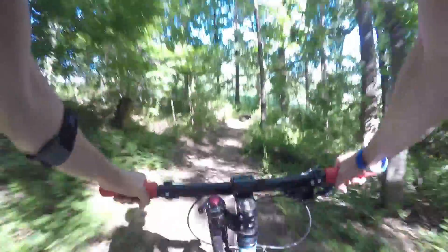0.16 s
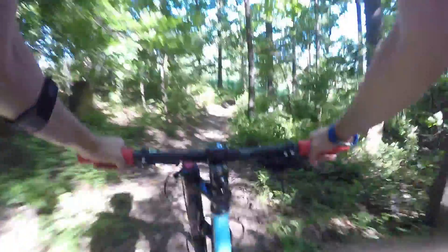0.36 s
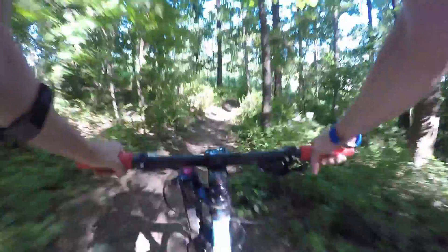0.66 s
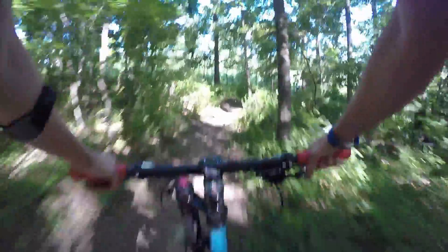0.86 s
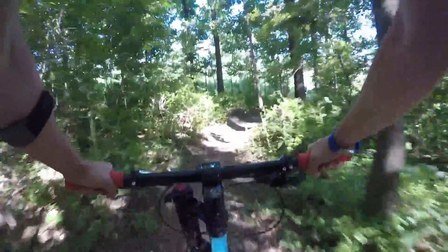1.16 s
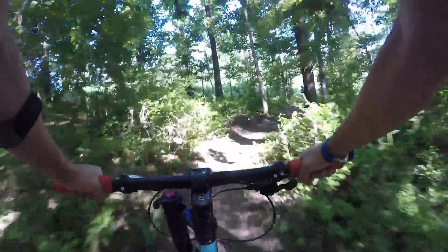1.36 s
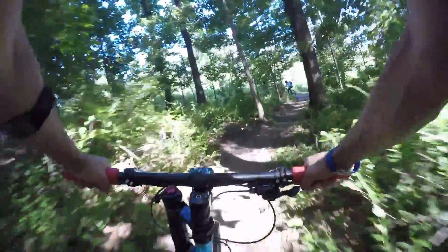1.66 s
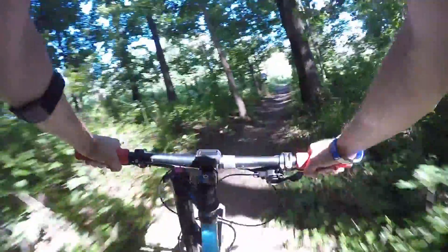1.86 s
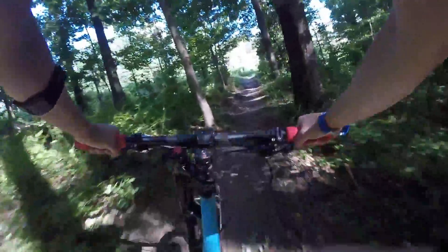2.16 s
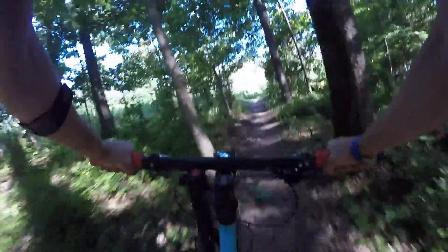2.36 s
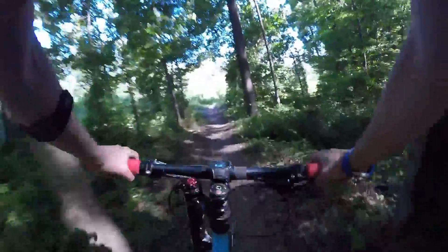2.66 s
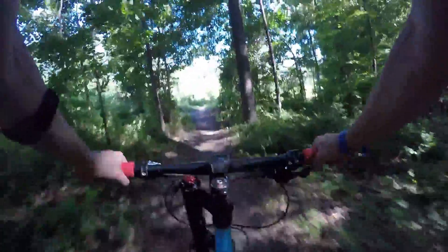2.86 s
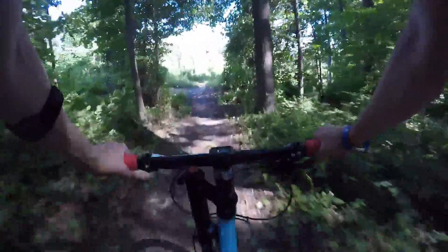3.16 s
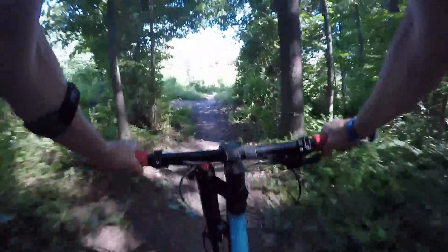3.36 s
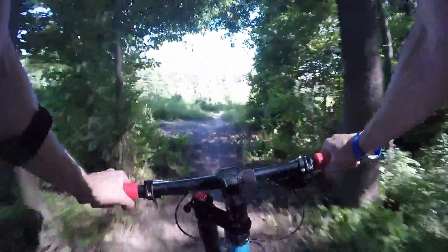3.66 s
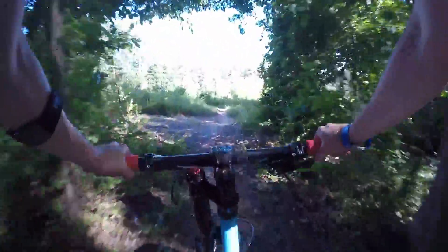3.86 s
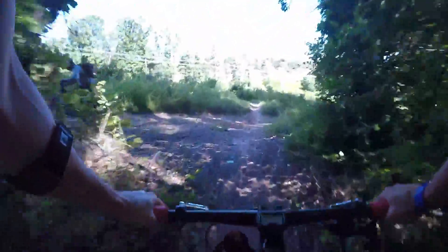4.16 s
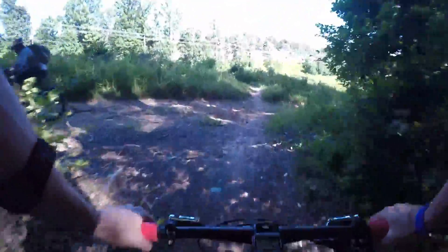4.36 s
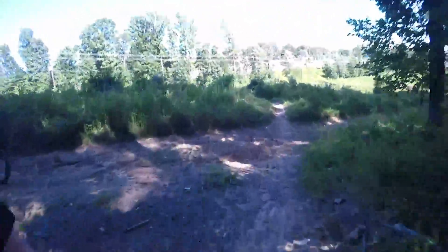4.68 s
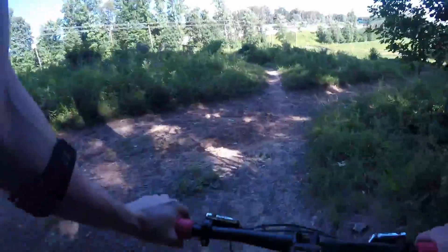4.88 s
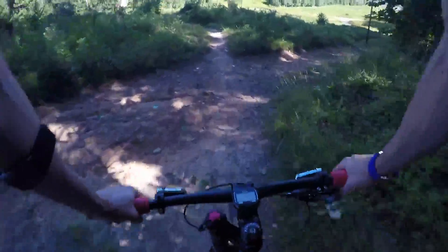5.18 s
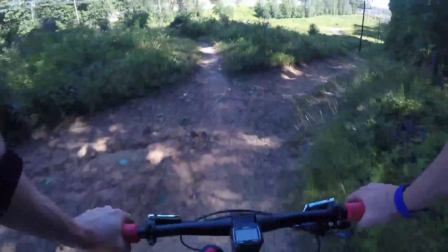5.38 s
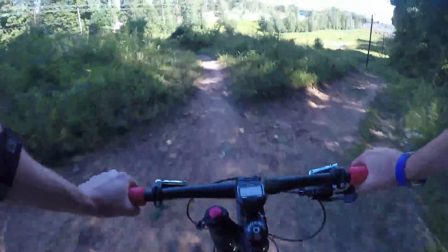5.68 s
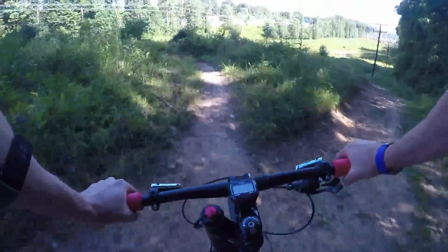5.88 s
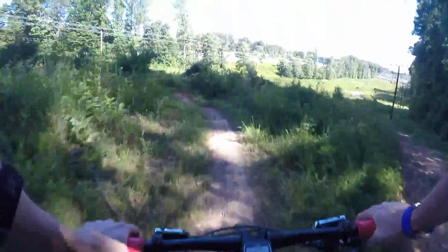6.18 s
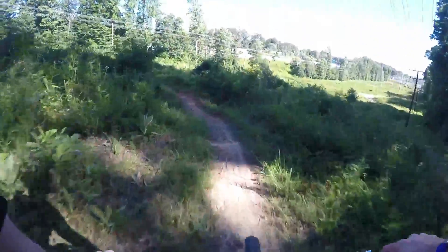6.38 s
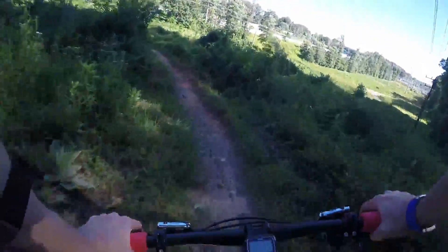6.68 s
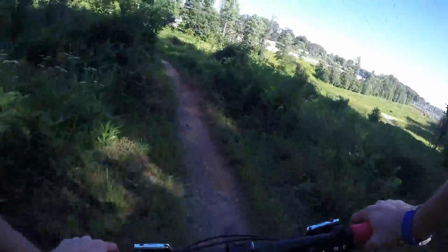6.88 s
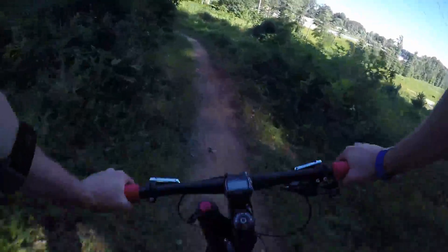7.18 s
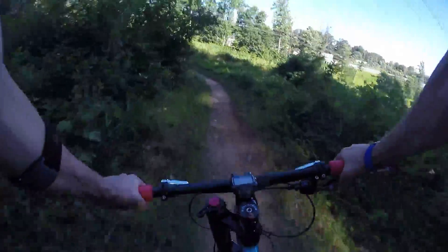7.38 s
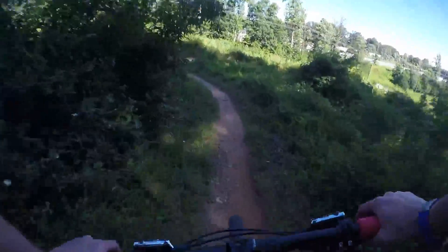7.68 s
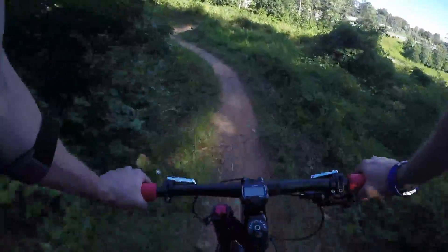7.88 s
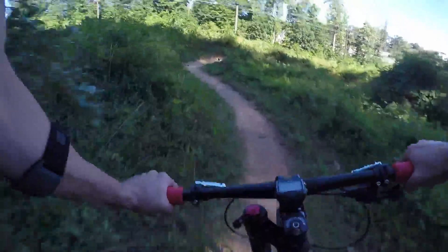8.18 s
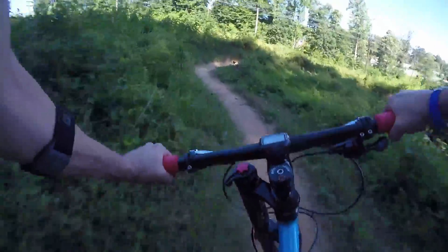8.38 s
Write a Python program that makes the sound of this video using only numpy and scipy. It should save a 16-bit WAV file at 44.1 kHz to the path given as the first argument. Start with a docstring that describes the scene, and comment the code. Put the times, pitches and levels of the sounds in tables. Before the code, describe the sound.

A mountain bike coasts along a dirt trail, heard from a muffled, boxy microphone housing on the rider's chest. Tyre crunch, low body rumble and a tiny sharp knock open at 0 s. From 0.3 s deep, soft heartbeats thump about 165 a minute to the end, varying in strength. A dry, rapid freehub ratchet starts near 0.5 s, slows and stops around 2.2 s, then resumes at 2.4 s and buzzes on with wavering speed. Light stone and cable clicks scatter, densest from 2.2 to 3.2 s, as rumble swells near 3.1 s. Knocks are sparser until 5.5 s, when loose gravel crunches. A heavy knock and rumble surge hit at 6.5 s, a bright hard crack at 6.85 s, a short leaf swish at 7.1 s. Coarser gravel follows at 7.25 and 8.0 s, with strong rattling knocks from 8.2 s and rising rumble. Faint wind hiss lies underneath.

```python
"""Body rumble and tyre crunch open the scene, with a sharp knock at once; heartbeats thump from 0.3 s.
A mountain bike coasts down a dirt trail, heard by a microphone in a closed housing strapped to the rider's chest.
Heart: enveloped low sines. Rumble, wind hiss: coloured noise. Tyres: noise roar and random grains. Freehub:
paired noise bursts per tooth while the pedals rest. Stones and cables: band-passed decaying knocks. A leaf: one
noise puff. Cavity resonances colour all but heart, rumble and hiss."""
import sys
import numpy as np
from scipy import signal
from scipy.fft import rfft, irfft, next_fast_len
from scipy.io import wavfile

SR = 44100
rng = np.random.default_rng(int(sys.argv[2]) if len(sys.argv) > 2 else 0)


def persist_wave(psi):
    """Save psi, clipped to +-1, as 16-bit WAV."""
    counts = np.round(np.clip(psi, -1, 1) * 32767).astype(np.int16)
    wavfile.write(sys.argv[1], SR, np.atleast_2d(counts).T)


N = 376613

# heartbeats: [t/s, first closure level/dB]
BEATS = [(0.31, -13), (0.68, -12), (1.045, -5.5), (1.41, -6), (1.775, -5.5), (2.141, -10), (2.507, -6),
         (2.867, -8), (3.235, -8.5), (3.595, -6), (3.96, -7.5), (4.323, -9), (4.68, -14), (5.052, -9.5),
         (5.413, -10.5), (5.779, -10), (6.135, -14.5), (6.51, -17), (6.872, -11), (7.221, -4), (7.587, -19),
         (7.961, -10), (8.31, -17)]
# valve closures: [delay/s, f/Hz, half length/s]
VALVES = [(0.012, 44, 0.01), (.032, 62, 0.0097)]
# faint edge of a beat: [delay/s, f/Hz, half length/s, level re first closure/dB]
BEAT_EDGE = (0.16, 108, 0.07, -20.5)
SECOND_VALVE_DB, SECOND_SPREAD_DB = -16, 4   # independent of the first closure

# knocks of stones and cables: [t/s, peak level/dB, pitch/octaves above 1 kHz]
KNOCKS = [(.0358, -26, 1.3), (.2329, -27.5, 3), (.512, -31.5, -1.5), (1.1885, -32, -1.1), (1.408, -20, 2.2),
          (1.498, -27.5, 1.8), (1.698, -23.5, 1.9), (1.9392, -26.5, 2), (2.186, -32, 0.2), (2.23, -29, 0),
          (2.3003, -22, 1), (2.382, -29, 0), (2.5065, -23.5, 1.9), (2.676, -25, 3), (2.771, -23, -1),
          (2.83, -20, 1.9), (2.951, -23.5, -1.1), (2.9857, -26.5, .1), (3.0921, -28.5, -.4),
          (3.187, -23, 1.3), (4.027, -24.5, -1.6), (4.829, -25.5, -.2), (4.9277, -31, -1),
          (4.9555, -25, -1), (4.975, -30.5, -0.9), (5.4744, -19, 2.2), (5.561, -26, 5), (6.0993, -30.5, 0),
          (6.5229, -8, 0.35), (6.5978, -26, -0.7), (6.843, -3.5, 4.5), (7.2245, -24, -.8),
          (7.296, -20.5, -1.3), (7.425, -23.5, -1.4), (8.1754, -10.5, 0.5), (8.315, -14.5, -0.1),
          (8.427, -9.5, -0.2)]
# bands of a knock, top to bottom: [low f/Hz, high f/Hz, t60/s]
KNOCK_BANDS = [(1740, 3850, 0.025), (870, 1605, 0.017), (295, 800, 0.013)]
# band loss away from the pitch, less for heavy knocks: [peak level/dB, loss/(dB per octave squared)]
KNOCK_FALL = [(-17, 7.5), (-8, 3)]
THUD_FLOOR_DB = -17   # lowest band, re knock peak

# freehub, one list per coast: [t/s, tick rate/(1/s)]
COASTS = [
    [(.489, 55), (.62, 67), (.87, 42), (1.1, 76), (1.35, 52), (1.65, 69.4), (1.88, 55), (1.98, 27),
     (2.17, 13)],
    [(2.44, 58), (2.59, 68), (2.76, 48), (3.06, 64), (3.34, 54), (3.9, 53), (4.17, 76), (4.44, 48),
     (4.84, 45.4), (5.25, 51.5), (5.76, 68.5), (6.06, 66), (6.34, 54.5), (6.66, 64), (7.2, 62), (7.39, 86),
     (7.62, 55), (7.88, 70), (8.26, 43), (8.54, 54.6)],
]
FREEHUB_DB = -33

# tyres on the trail: [t/s, dull roll level/dB, crunch level/dB]
TREAD = [(0, -32, -34), (.3, -40, -42.5), (1, -37, -40), (1.3, -46.5, -42), (2.1, -37, -42),
         (2.7, -39, -38), (4.7, -38.5, -43), (5.3, -38.5, -39), (6.4, -36.5, -39.5), (8.54, -35, -38)]
# loose gravel under the tyres: [start t/s, hold/s, crunch level/dB]
GRAVEL = [(0.933, .08, -40), (5.552, 0.34, -34), (7.256, 0.16, -29), (8.03, .3, -32)]
GRAVEL_ATTACK_S, GRAVEL_FADE_PER_HOLD = 0.018, 0.68

# a leaf whips past: [t/s, level/dB, half length/s]
LEAF = (7.092, -16, .008)

# body rumble over time: [t/s, level/dB]
BODY = [(0, -22), (.26, -21), (.55, -29), (1.2, -24.5), (2.5, -25), (3.1, -17), (3.6, -28.5), (4.2, -27.5),
        (4.8, -25.5), (5.7, -26.5), (6.4, -23), (6.58, -14.5), (6.8, -27.5), (7.4, -18.5), (7.9, -21.5),
        (8.54, -16)]
# body rumble spectrum: [f/Hz, relative level/(dB per Hz)]
RUMBLE = [(7.1, -28), (12, 8), (27, 10.5), (44, -6), (95, -13.5), (192, -34), (285, -37.5), (400, -50),
          (520, -79), (880, -120)]

# wind hiss spectrum: [f/Hz, relative level/(dB per Hz)]
HISS = [(150, 25), (400, -5.5), (1400, 1), (4000, -3), (8000, -6.5), (15000, -11.5)]
HISS_DB = -58

# housing cavity resonances: [f/Hz, width/Hz, level/dB]
HOUSING = [(320, 330, -9.5), (456, 415, -3.5), (782, 430, -5), (1053, 350, 0.5), (1770, 265, 1.5),
           (2310, 594, -2), (2893, 623, 2), (3550, 940, -5), (4186, 230, -7.5), (4717, 355, -6),
           (5580, 680, -8), (6440, 510, -7), (7590, 1100, -17.5), (9770, 1820, -13.5), (11340, 1900, -24),
           (13700, 3900, -22.5)]
CUTOFF_HZ = 15300


def heart():
    """Two valve closures a beat shake the chest wall: sines under Gaussian envelopes."""
    out = np.zeros(N)
    t_s = np.arange(int(.1 * SR)) / SR - .03

    def swing(delay_s, hz, half_s):
        """Sine that swells and fades around its delay."""
        since_s = t_s - delay_s
        return np.sin(2 * np.pi * hz * since_s) * np.exp(-(since_s / half_s) ** 2)

    first, second = [swing(*valve) for valve in VALVES]
    # the edge peaks past the end of t_s: only its rising flank sounds
    first = first + from_db(BEAT_EDGE[3]) * swing(*BEAT_EDGE[:3])
    seconds_db = SECOND_VALVE_DB + SECOND_SPREAD_DB * rng.standard_normal(len(BEATS))
    for (beat_s, first_db), second_db in zip(BEATS, seconds_db):
        start = int((beat_s + t_s[0]) * SR)
        out[start:start + len(t_s)] += from_db(first_db) * first + from_db(second_db) * second
    return out


def knocks():
    """Sharp contact, then a short rattle in three bands; the top band lies lower in heavy knocks."""
    out = np.zeros(N + SR)
    t_s = np.arange(int(.05 * SR)) / SR
    knock_s, peak_db, pitch_oct = np.transpose(KNOCKS)
    starts = (knock_s * SR).astype(int)

    centres_oct = np.log2([np.sqrt(low * high) / 1000 for low, high, _ in KNOCK_BANDS])
    fall = np.interp(peak_db, *np.transpose(KNOCK_FALL))
    loss_db = fall * (centres_oct[:, None] - pitch_oct) ** 2
    bands_db = peak_db - loss_db + loss_db.min(axis=0)   # strongest band gets the knock's level
    bands_db[-1] = np.maximum(bands_db[-1], peak_db + THUD_FLOOR_DB)

    for band, (low_hz, high_hz, t60_s) in enumerate(KNOCK_BANDS):
        rattles = rng.standard_normal((len(KNOCKS), len(t_s))) * from_db(-60 * t_s / t60_s)
        rattles[:, 0] += 6   # contact
        for start, band_db, rattle in zip(starts, bands_db[band], rattles):
            shift = from_db(-.16 * (band_db + 19.0)) if band == 0 else 1   # frequency factor
            edges_hz = [low_hz * min(shift, 1.2), max(high_hz * shift, 1.3 * low_hz)]
            crack = cut(rattle, edges_hz, "band")
            out[start:start + len(t_s)] += from_db(band_db) * crack / np.abs(crack).max()
    return out[:N]


def freehub():
    """Ratchet as a function of resonance: a pawl drops at every passing tooth, a short bright rattle."""
    t_s = np.arange(N) / SR
    drops_s = []
    for coast in COASTS:
        points_s, per_s = np.transpose(coast)
        span_s = t_s[(t_s >= points_s[0]) & (t_s < points_s[-1])]
        teeth = np.cumsum(np.interp(span_s, points_s, per_s)) / SR
        tooth_numbers = np.arange(int(teeth[-1]) + 1) + .15
        drops_s += list(np.interp(tooth_numbers, teeth, span_s) - .004)
    chance = rng.standard_normal((len(drops_s), 2))
    drops_s = np.array(drops_s) + 0.00071 * chance[:, 0]
    shared_db = FREEHUB_DB + 0.94 * chance[:, 1]

    def at(hz):
        own_db = 3.03 * rng.standard_normal(len(drops_s))   # every drop favours other resonances
        gains = from_db(shared_db + own_db)
        # a second pawl follows 4 ms later
        both_s, both_gains = np.r_[drops_s, drops_s + .004], np.r_[gains, .7 * gains]
        ticks = bursts(both_s, both_gains, t60_s=0.048, rise_s=0.0012)
        return ticks / (1 + (3000 / hz) ** 2)
    return at


def tyres():
    """Tread as a function of resonance: roar plus clumped grit, dull below 1.4 kHz, crunchy above."""
    roll = from_db(in_time(TREAD))
    crunch = np.hypot(from_db(in_time(TREAD, 2)), gravel())
    clumps = from_db(5.0 * drift(9.8))
    lumps = from_db(2.0 * drift(7.3))

    def at(hz):
        roar = rng.standard_normal(N) * lumps * from_db(3.15 * drift(16.3))
        both = roar + from_db(-3.0) * grit(90 * clumps, spread_db=4.0)
        gain = roll if hz < 1400 else crunch
        return both * gain / (1 + (hz / 3900) ** 16.4)
    return at


def gravel():
    """Crunch gain on loose patches: each swells, holds and fades linearly."""
    t_s = np.arange(N) / SR
    gain = np.zeros(N)
    for start_s, hold_s, db in GRAVEL:
        corners_s = np.cumsum([0, GRAVEL_ATTACK_S, hold_s, GRAVEL_FADE_PER_HOLD * hold_s])
        gain += from_db(db) * np.interp(t_s - start_s, corners_s, [0, 1, 1, 0])
    return gain


def grit(per_s, spread_db):
    """Random grains of either sign, a few much larger than the rest; rms 1."""
    sizes = from_db(spread_db * np.minimum(rng.exponential(1, N), 4)) * rng.choice([-1, 1], N)
    hits = rng.random(N) < per_s / SR
    return rms_one(sizes * hits / np.sqrt(per_s))


def leaf():
    """A passing leaf: one smooth puff of high-passed noise."""
    peak_s, db, half_s = LEAF
    shape = np.exp(-((np.arange(N) / SR - peak_s) / half_s) ** 2)
    return from_db(db) * shape * cut(rng.standard_normal(N), 4100, "high")


def body_rumble():
    """Body shake through the strap: low noise of wandering level."""
    level_db = in_time(BODY) + 2.0 * drift(6.9) + 2.0 * drift(4.3)
    return from_db(level_db) * coloured(RUMBLE)


def wind_hiss():
    """Wind at the microphone: coloured noise of slowly wandering level."""
    return from_db(HISS_DB + 3.94 * drift(1.9)) * coloured(HISS)


def housing(common, scattered):
    """Parallel cavity resonances, steep-sided, signs alternating; scattered(hz) feeds one alone."""
    out = 0
    for k, (hz, width_hz, db) in enumerate(HOUSING):
        r = np.exp(-np.pi * width_hz / SR)
        b = (1 - r * r) / 2
        section = [b, 0, -b, 1, -2 * r * np.cos(2 * np.pi * hz / SR), r * r]
        ringing = signal.sosfilt([section, section], common + scattered(hz))
        out = out + (-1) ** k * from_db(db) * ringing
    return out


def from_db(db):
    """Gain of a level."""
    return 10 ** (np.asarray(db) / 20)


def rms_one(x):
    """Scale to unit rms."""
    return x / np.sqrt(np.mean(x ** 2) + 1e-20)


def in_time(rows, column=1):
    """One column of a curve at every sample."""
    points = np.array(rows)
    return np.interp(np.arange(N) / SR, points[:, 0], points[:, column])


def drift(corner_hz):
    """Slow chance: noise through a double one-pole low-pass, spread 1; made at SR / 40."""
    r = np.exp(-80 * np.pi * corner_hz / SR)
    noise = rng.standard_normal(N // 40 + 2002)
    slow = signal.lfilter([1], [1, -2 * r, r * r], noise)[2000:]   # settled part
    return np.interp(np.arange(N) / 40, np.arange(len(slow)), rms_one(slow))


def coloured(spectrum):
    """Noise shaped by a spectrum in log frequency, rms 1."""
    hz, db = np.transpose(spectrum)
    size = next_fast_len(N)
    bins_hz = np.fft.rfftfreq(size, 1 / SR) + 1   # + 1 avoids log(0)
    shape = from_db(np.interp(np.log(bins_hz), np.log(hz), db, left=-80))
    return rms_one(irfft(rfft(rng.standard_normal(size)) * shape, size)[:N])


def cut(x, hz, kind, order=2):
    """Butterworth filter."""
    return signal.sosfilt(signal.butter(order, hz, kind, fs=SR, output="sos"), x)


def bursts(times_s, gains, t60_s, rise_s):
    """Short noise bursts: quick swell, exponential fall."""
    clicks = np.full(N, 1e-18)
    np.add.at(clicks, np.clip((np.asarray(times_s) * SR).astype(int), 0, N - 1), gains)
    swell = np.exp(-1 / (rise_s * SR))
    fall = from_db(-60 / (t60_s * SR))
    shape = signal.lfilter([1 - swell], np.convolve([1, -swell], [1, -fall]), clicks)
    return shape * rng.standard_normal(N)


def scene():
    """Air sound rings in the housing; heart, rumble and hiss reach the microphone directly."""
    tread, ratchet = tyres(), freehub()
    air = housing(knocks() + leaf(), lambda hz: tread(hz) + ratchet(hz))
    return (heart() + air + body_rumble() + wind_hiss())[None]


def record(dry):
    """Steep elliptic low-pass."""
    return signal.sosfilt(signal.ellip(10, .5, 45, CUTOFF_HZ, fs=SR, output="sos"), dry)


dry = scene()
out = record(dry)
persist_wave(out)
```